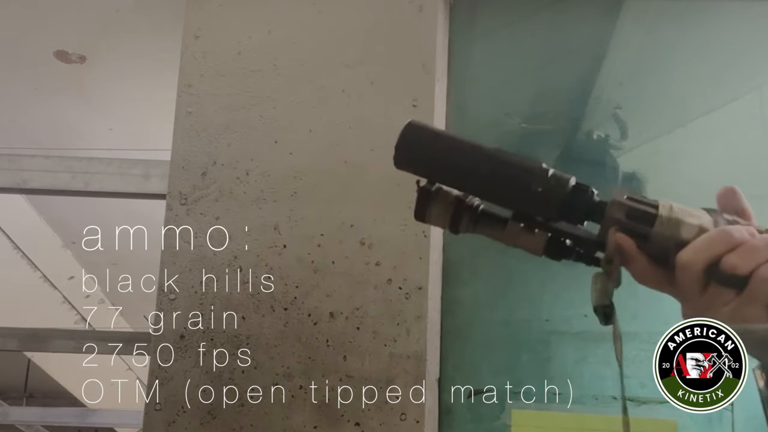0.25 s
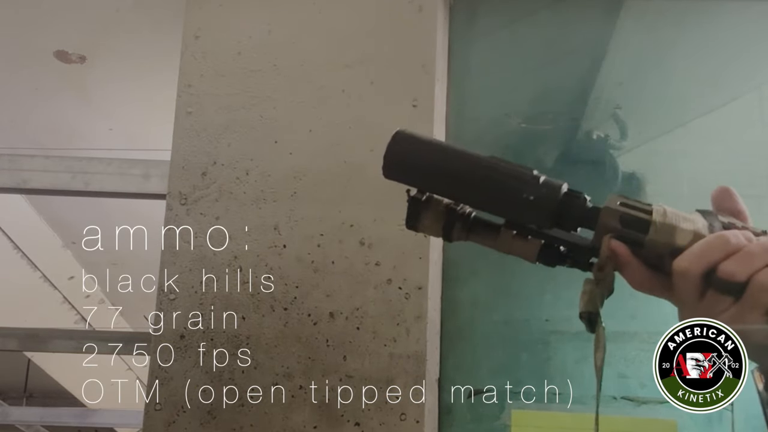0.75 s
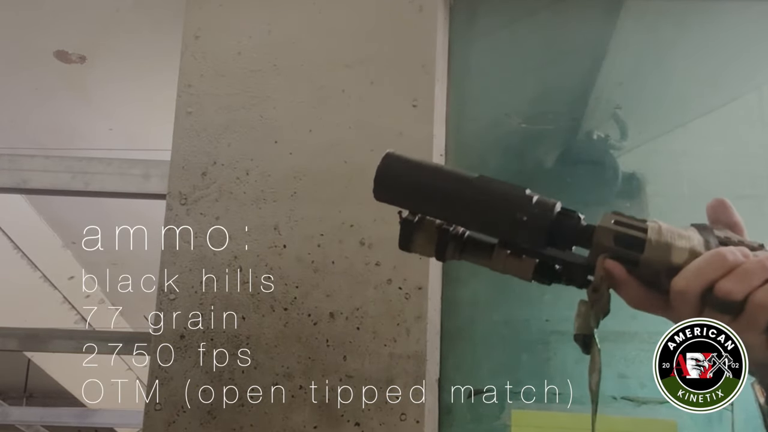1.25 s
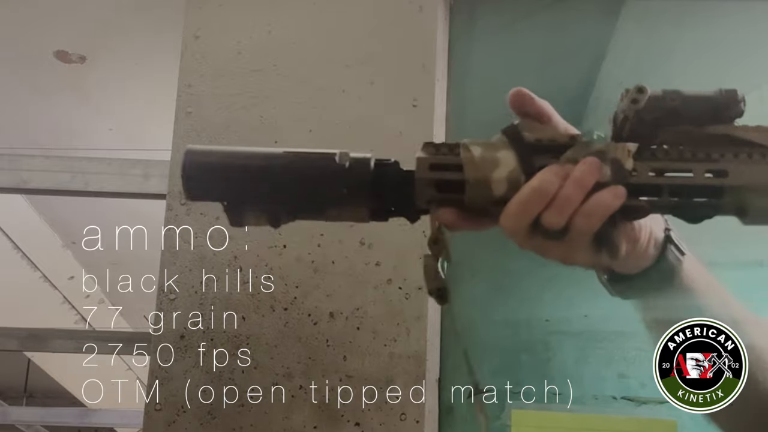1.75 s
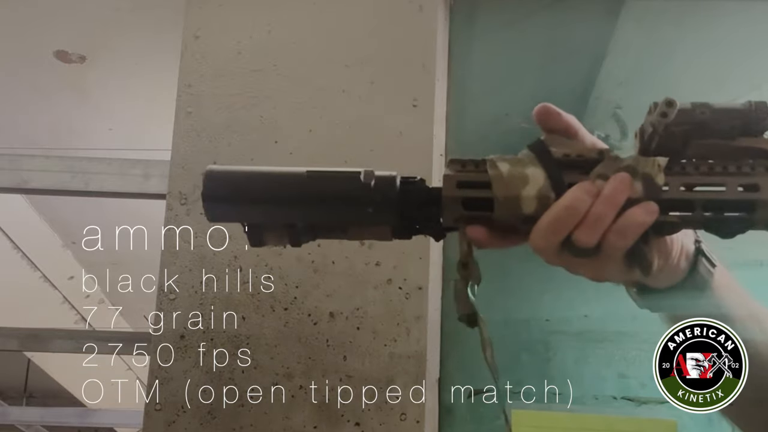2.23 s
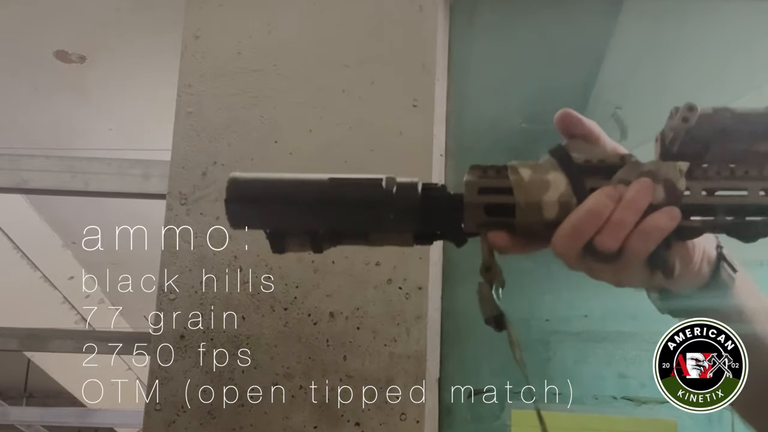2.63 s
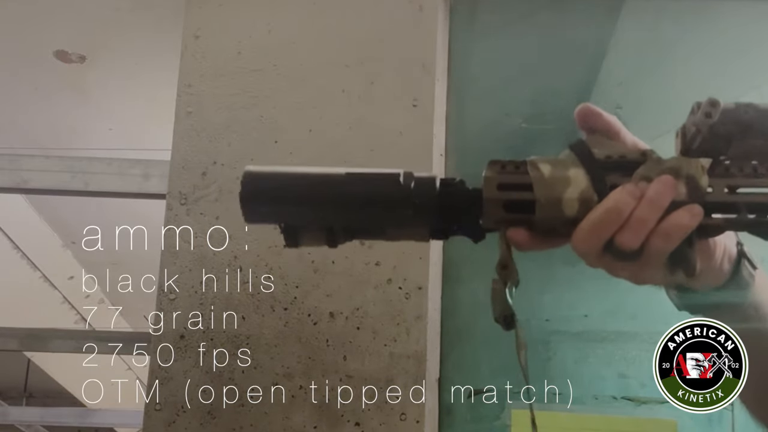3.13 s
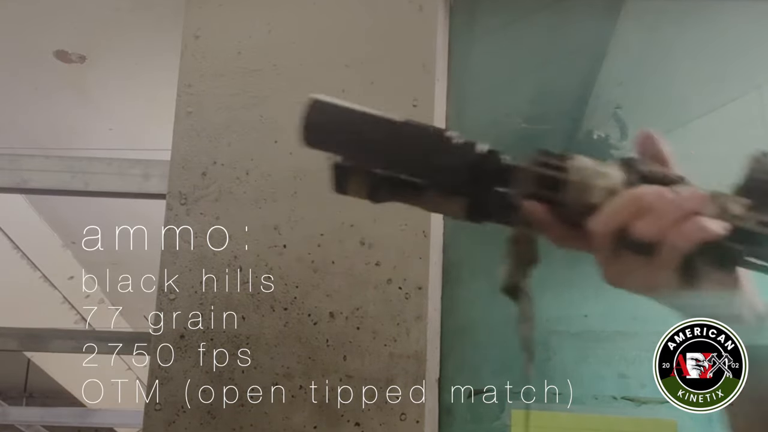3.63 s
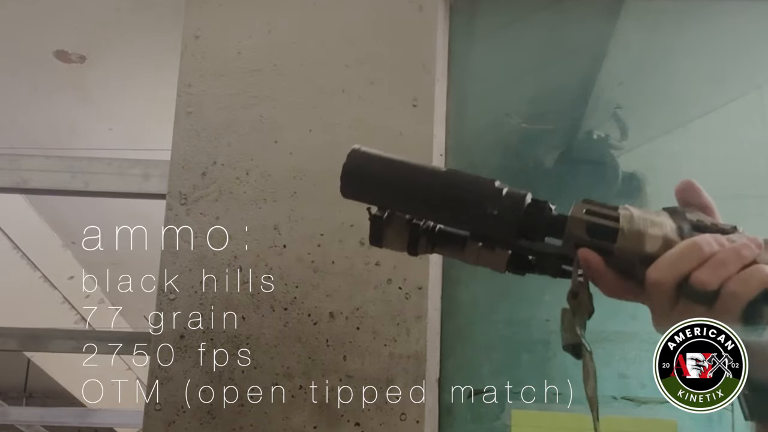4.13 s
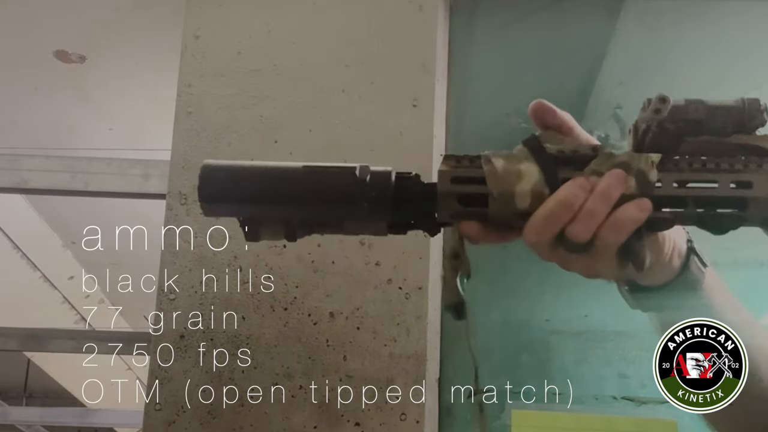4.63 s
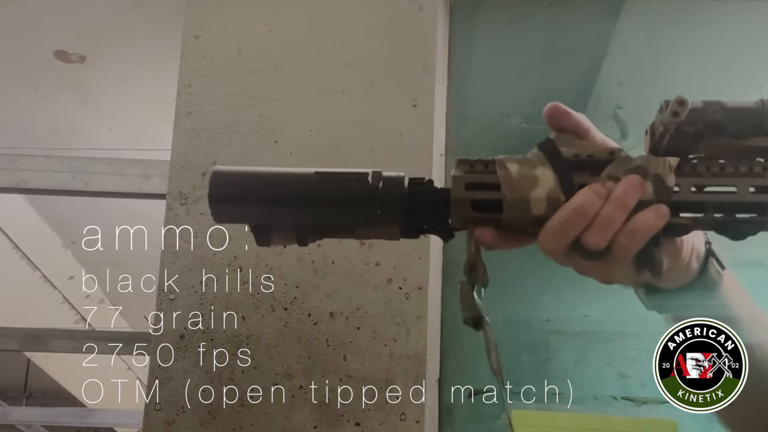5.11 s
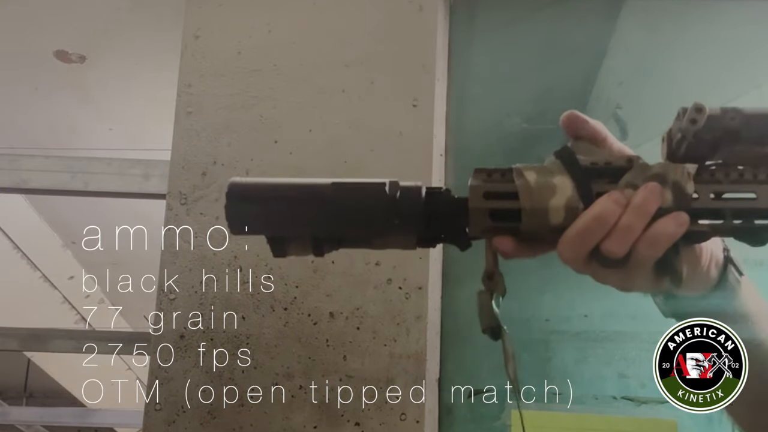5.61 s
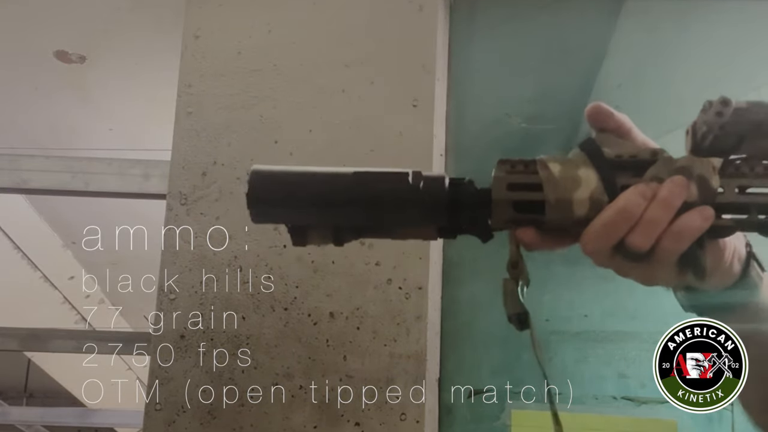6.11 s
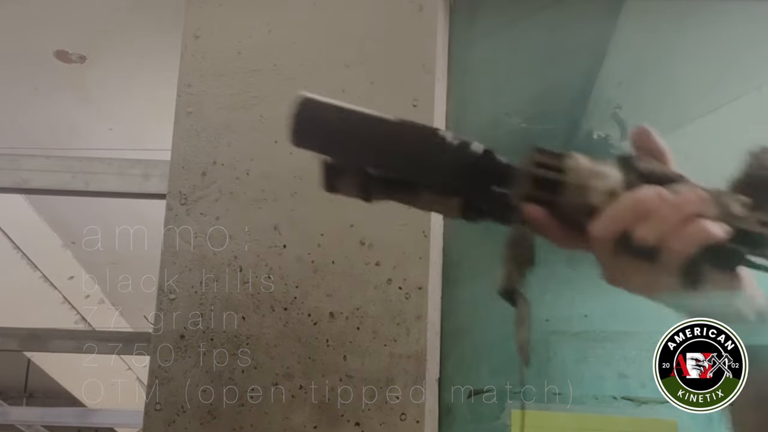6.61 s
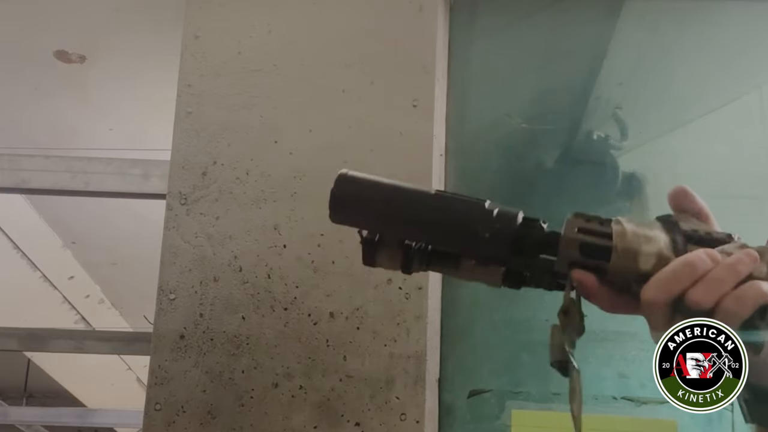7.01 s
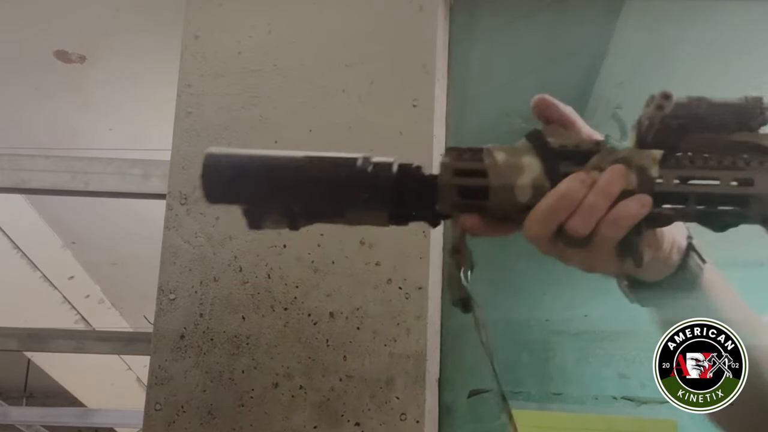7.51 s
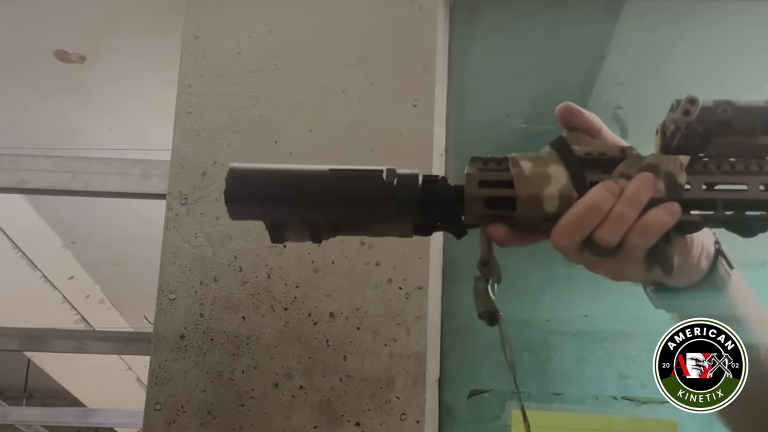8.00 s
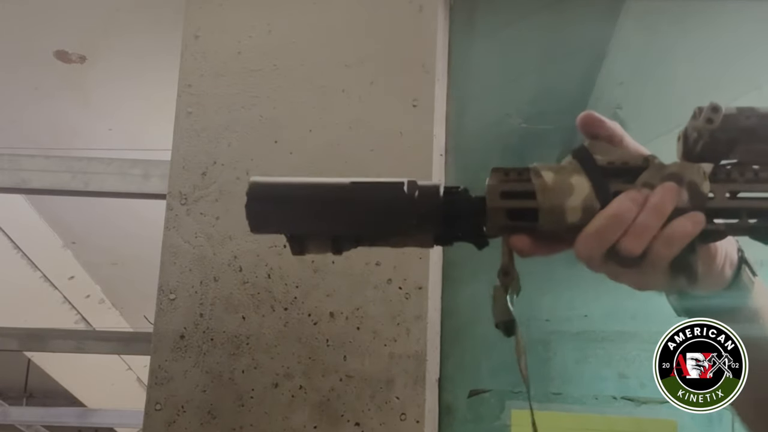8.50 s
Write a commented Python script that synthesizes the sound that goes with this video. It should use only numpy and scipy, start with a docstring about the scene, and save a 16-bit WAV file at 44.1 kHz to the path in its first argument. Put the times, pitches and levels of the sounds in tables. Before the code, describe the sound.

Close stereo pickup beside a suppressed rifle in a large hard-walled hall with steady fan drone. A dying echo and tinkling brass open it, followed by light handling. Two fast pairs of shots come about three seconds apart, then a lone shot cut off in its echo. Each has a blunt burst, a hissing swelling crack, a heavy distant slam and a slow rumble; loud shots briefly duck everything.

```python
"""In a hard-walled indoor range, air rushes under the droning fans while the echo of an earlier rifle shot fades.
Spent cases tick and ring on the concrete; the sling flicks and hands knock softly as the rifle is raised.
Then come two pairs of shots from a suppressed rifle and one last shot. Each is a short burst of shaped noise,
a crack that swells along the lane, a slam from the backstop and a long rumble of the hall.
More cases land in between, and every loud sound turns the gain down for a while."""
import sys
import numpy as np
from scipy import signal
from scipy.fft import rfft, irfft
from scipy.io import wavfile
from scipy.ndimage import uniform_filter1d

SR = 44100
rng = np.random.default_rng(int(sys.argv[2]) if len(sys.argv) > 2 else 0)


def digitize_waveform(pressure):
    """Quantize a signal to 16-bit integers and store it at the path in sys.argv[1].

    Rows of a 2-D input are taken as channels; values are limited to [-1, 1].
    """
    field = np.atleast_2d(pressure).T
    bounded = np.clip(field, -1, 1)
    quanta = np.round(bounded * 32767).astype(np.int16)
    wavfile.write(sys.argv[1], SR, quanta)


N = 385875  # length of the scene in samples

# The slam from the backstop, then its heavier bounce off floor and walls:
# (delay after the shot [s], level before the shot's own [dB], extra bass [dB])
SLAM_ARRIVALS = [(.1195, -.4, -3.5), (.151, -3.5, .5)]
# How long the hall takes to fade by 60 dB: (frequency [Hz], decay time [s])
HALL_DECAY = [(60, 1.8), (200, 1.9), (600, 2.28), (1200, 2.3), (2300, 2.07), (4000, 1.74), (6500, 1.28),
              (10000, .87), (15000, .73)]


def amp(db):
    """Turns decibels into a gain."""
    return 10 ** (np.asarray(db) / 20)


def read(points, hz):
    """Joins table points by straight lines on a log-frequency axis."""
    f, value = np.transpose(points)
    return np.interp(np.log(hz + 1), np.log(f), value)


def add(mix, s, sound):
    """Mixes a stereo sound in at time s, which may lie before the start."""
    start = round(s * SR)
    sound = sound[:, max(-start, 0):]
    part = mix[:, max(start, 0):][:, :sound.shape[1]]
    part += sound[:, :part.shape[1]]


def noise(spectrum, size, sideways=0):
    """Makes many random arrivals with the given spectrum, as the two microphone ports hear them."""
    # The ports hear in opposition near 8 kHz and alike near 13 kHz: (frequency [Hz], side minus mid [dB])
    ports = [(100, -21), (200, -17), (350, -6.5), (850, 2.3), (1400, -1.5), (2100, -7.5), (3000, -.7),
             (4200, -2.7), (6700, .5), (7500, 38), (9200, 38), (10200, 2), (13200, -17), (15500, -6)]
    # Sound along the lane strikes the ports from one side:
    # (frequency [Hz], extra side level when sideways is 1 [dB])
    lane_side = [(50, 16), (190, 22), (380, 14), (800, 10), (2100, 6), (4500, 0)]
    # Tilt between the ears: (frequency [Hz], left minus right before the side is mixed in [dB])
    balance = [(200, 0), (550, .8), (950, 2.8), (1900, 3.3), (2600, -.3), (5200, -1.8), (7500, 0)]
    hz = np.fft.rfftfreq(size, 1 / SR)
    colour = amp(read(spectrum, hz)) * np.sqrt(SR / 2)  # from level per Hz to level per sample
    mid, side = rfft(rng.standard_normal((2, size))) * colour
    width = amp(read(ports, hz) + sideways * read(lane_side, hz))
    lean = amp(read(balance, hz) / 2)
    left = (mid + width * side) * lean
    right = (mid - width * side) / lean
    return irfft(np.array([left, right]) / np.hypot(1, width), size)  # hypot keeps the power steady


def die_away(x, t60, rise_s):
    """Fades each frequency band at its own speed, after a quick rise."""
    hz, t, z = signal.stft(x, SR, nperseg=256)
    fade_db = -60 * t / read(t60, hz)[:, None]
    faded = signal.istft(z * amp(fade_db), SR, nperseg=256)[1]
    size = x.shape[1]
    rise = np.minimum(np.arange(size) / SR / rise_s, 1)
    return faded[:, :size] * rise


def ventilation(waver_hz=1.6):
    """Adds the rush of air in the ducts to fan tones whose pitch wavers slowly at random."""
    # Rushing air: (frequency [Hz], level per Hz [dB])
    air = [(20, -114), (40, -87.5), (65, -80.5), (130, -83), (220, -89), (400, -90.5), (680, -86.5),
           (1400, -94), (2350, -92), (3300, -107.5), (6000, -122), (9000, -130), (13000, -125.7),
           (16000, -133)]
    # Drone of the fans: (frequency [Hz], rms level [dB])
    fans = [(84, -64), (121, -64.5)]
    t = np.arange(N) / SR
    knots = np.linspace(0, N / SR, 60)
    hum = np.zeros(N)
    for hz, db in fans:
        pitch_hz = hz + waver_hz * np.interp(t, knots, rng.standard_normal(len(knots)))
        phase = 2 * np.pi * np.cumsum(pitch_hz) / SR
        hum += amp(db) * np.sqrt(2) * np.sin(phase)
    return noise(air, size=N) + hum


def snap(level_db=-25, length_s=.003):
    """Makes the first front from the muzzle: a tiny noise burst that reaches both ports head-on."""
    t = np.arange(SR // 20) / SR
    burst = amp(level_db) * rng.standard_normal(len(t)) * np.exp(-t / length_s)
    return np.tile(burst, (2, 1))


def blast(level_db=.2):
    """Makes the muzzle blast: noise along the lane that rises at once and fades band by band."""
    # Start of the decay, before the level settings: (frequency [Hz], level per Hz [dB])
    blast_spectrum = [(20, -90), (55, -56), (130, -50), (350, -52), (600, -55), (1200, -54), (1900, -59),
                      (2400, -55.5), (3800, -62), (5500, -61), (9500, -67), (13000, -59.3), (16000, -62.5)]
    # Time to fade by 60 dB: (frequency [Hz], decay time [s])
    blast_decay = [(60, .75), (200, .45), (800, .29), (3000, .37), (13000, .6)]
    dense = noise(blast_spectrum, size=SR, sideways=1)
    return amp(level_db) * die_away(dense, blast_decay, rise_s=.002)


def crack(t, level_db=-1, start_db=-20.5, half_s=.128, spread_s=.029):
    """Scatters the bullet's shock wave back; the crack swells as the bullet flies down the lane."""
    # Spectrum before the swell, decay and level settings: (frequency [Hz], level per Hz [dB])
    crack_spectrum = [(200, -85), (900, -54), (1500, -46.7), (2050, -38.3), (2350, -36.3), (2850, -41.2),
                      (4000, -46), (5500, -47.4), (7500, -51.7), (9500, -54), (13000, -48.8), (16000, -54)]
    flown = (1 + np.tanh((t - half_s) / (2 * spread_s))) / 2  # half-way at half_s
    swell = flown + amp(start_db) * (1 - flown)
    scattered = die_away(noise(crack_spectrum, size=len(t)), HALL_DECAY, rise_s=.002)
    return amp(level_db) * scattered * swell


def backstop(bass_hz=220, level_db=0):
    """Makes the bullet's strike on the trap at the far end, whose slam comes back along the lane."""
    # Start of the decay, before extra bass and level: (frequency [Hz], level per Hz [dB])
    slam_spectrum = [(20, -82), (60, -42), (140, -43), (400, -40), (700, -34.5), (1100, -39), (1700, -45.5),
                     (2500, -44.5), (4000, -53), (9000, -70), (16000, -78)]
    # Time to fade by 60 dB: (frequency [Hz], decay time [s])
    slam_decay = [(80, .36), (500, .2), (4000, .15)]
    out = np.zeros((2, SR))
    for delay, db, bass_db in SLAM_ARRIVALS:
        # the extra bass acts fully on low tones and dwindles above bass_hz
        spectrum = [(hz, level + bass_db / (1 + (hz / bass_hz) ** 2)) for hz, level in slam_spectrum]
        slam = die_away(noise(spectrum, size=SR, sideways=.8), slam_decay, rise_s=.0015)
        add(out, delay, amp(db) * slam)
    return amp(level_db) * out


def hall(t, level_db=-.2, start_db=-25, fill_s=.028):
    """Lets the hall murmur after the blast, then fill up once the slam comes back, and fade slowly."""
    # Spectrum before the swell, decay and level settings: (frequency [Hz], level per Hz [dB])
    hall_spectrum = [(20, -88), (35, -66), (55, -49), (140, -41.8), (260, -43.4), (600, -41), (950, -40.6),
                     (1400, -46.5), (2200, -55), (5000, -80)]
    since_slam = np.maximum(t - SLAM_ARRIVALS[0][0], 0)
    filled = 1 - np.exp(-since_slam / fill_s)
    swell = filled + amp(start_db) * (1 - filled)
    rumble = die_away(noise(hall_spectrum, size=len(t)), HALL_DECAY, rise_s=.005)
    return amp(level_db) * rumble * swell


def shots():
    """Joins snap, blast, crack, slam and hall; the rifle stays in place, so slam and hall repeat exactly."""
    # One row a shot; the first is fired before the start and only its echo is left:
    # (time [s], strength [dB])
    firings = [(-.72, -2), (2.361, .3), (2.921, .1), (5.2155, 0), (5.812, 0), (8.219, -.4)]
    out = np.zeros((2, N))
    t = np.arange(3 * SR) / SR
    rumble = hall(t)
    slam = backstop()
    for s, db in firings:
        # every bullet flies its own path, so its shock wave scatters anew
        for part in (snap(), blast(), crack(t), slam, rumble):
            add(out, s, amp(db) * part)
    return out


def cases(ring_t60=.42, low_t60=.6, low_hz=10620, low_db=-17, split_hz=60, tick_s=.003):
    """Ticks brass on concrete; the case mouth rings in close, beating modes, with a lower mode below."""
    # Landings and bounces: (time [s], tick level [dB], ring level [dB], ring frequency before the split [Hz])
    landings = [(.028, -60, -54, 15050), (.113, -57, -53, 15200), (3.551, -56, -45, 15020),
                (3.808, -66, -56, 14980), (3.878, -58, -78, 15000), (4.173, -63, -75, 15500),
                (5.717, -50, -46, 15000), (6.647, -50, -41, 14860), (7.055, -65, -56, 14920),
                (7.176, -62, -72, 15000), (7.330, -58, -48, 15200), (7.412, -55, -65, 15200),
                (7.569, -66, -54, 15250)]
    out = np.zeros((2, N))
    t = np.arange(SR) / SR
    ring_fade = np.exp(-np.log(1000) * t / ring_t60)  # down 60 dB after ring_t60 seconds
    low_fade = np.exp(-np.log(1000) * t / low_t60)
    for s, tick_db, ring_db, hz in landings:
        modes_hz = hz + split_hz * rng.standard_normal((4, 1))
        modes = np.sin(2 * np.pi * (modes_hz * t + rng.random((4, 1))))
        ring = amp(ring_db) * modes.sum(0) / 2 * ring_fade
        # the lower mode is as strong as the tick asks
        low = amp(tick_db + low_db) * np.sin(2 * np.pi * low_hz * t) * low_fade
        tick = amp(tick_db) * rng.standard_normal(SR) / 2 * np.exp(-t / tick_s)
        add(out, s, np.tile(ring + low + tick, (2, 1)))
    return out


def touches(events, spectrum, peak_s):
    """Makes short soft puffs of noise of one colour, each strongest peak_s after it begins."""
    out = np.zeros((2, N))
    u = np.arange(SR // 2) / SR / peak_s
    for s, db in events:
        add(out, s, amp(db) * noise(spectrum, size=len(u)) * u * np.exp(1 - u))
    return out


def handling():
    """Flicks the sling as the rifle swings up and knocks the rifle softly on hands and shoulder."""
    # Flicks of the sling: (time [s], level relative to the rustle spectrum [dB])
    flicks = [(1.35, -10), (1.655, -2)]
    # Colour of a flick: (frequency [Hz], level per Hz before the flick's own level [dB])
    rustle = [(500, -110), (2500, -100), (5000, -106), (9000, -118), (14000, -113)]
    # Knocks as the rifle is raised: (time [s], level relative to the thump spectrum [dB])
    knocks = [(1.53, -3), (1.935, -4), (2.07, -6.5), (2.215, -5.5), (4.77, -5), (5.01, -4), (5.18, -3),
              (8.09, -7)]
    # Colour of a knock: (frequency [Hz], level per Hz before the knock's own level [dB])
    thump = [(25, -95), (70, -69), (160, -68), (300, -82), (1000, -100), (4000, -130)]
    return touches(flicks, rustle, peak_s=.005) + touches(knocks, thump, peak_s=.014)


def scene():
    """Adds shots, cases and handling to the steady ventilation."""
    return ventilation() + shots() + cases() + handling()


def gain_control(x, threshold_db=-15.5, squeeze=.45, recovery_db_per_s=3.):
    """Drops the gain on a loud sound and lets it creep back, so the second shot of a pair starts softer."""
    power = uniform_filter1d((x ** 2).mean(0), size=600)
    power_db = 10 * np.log10(abs(power) + 1e-12)
    excess_db = squeeze * np.maximum(power_db - threshold_db, 0)
    # a running maximum against a steady slope holds each peak and lets it sink
    fall_db = recovery_db_per_s * np.arange(N) / SR
    held_db = np.maximum.accumulate(excess_db + fall_db) - fall_db
    return x / amp(uniform_filter1d(held_db, size=200))


def record(dry):
    """Applies gain control, clips at full scale and removes the highest treble."""
    edge_hz = 15850
    limited = np.clip(gain_control(dry), -1, 1)
    lowpass = signal.firwin(511, edge_hz, window=("kaiser", 9), fs=SR)
    return signal.oaconvolve(limited, lowpass[None], "same", axes=1)


dry = scene()
out = record(dry)
digitize_waveform(out)
```